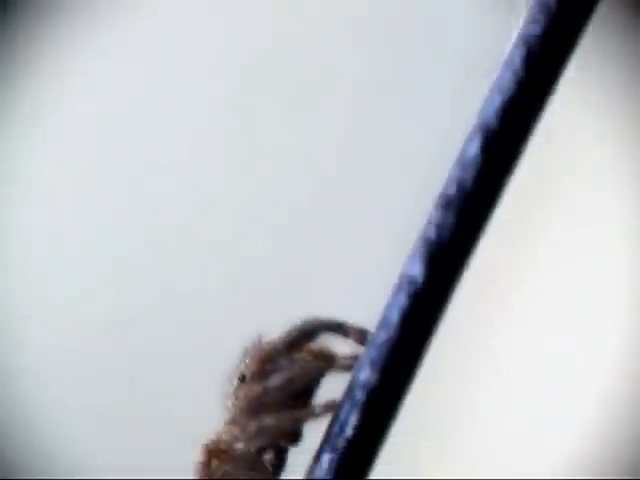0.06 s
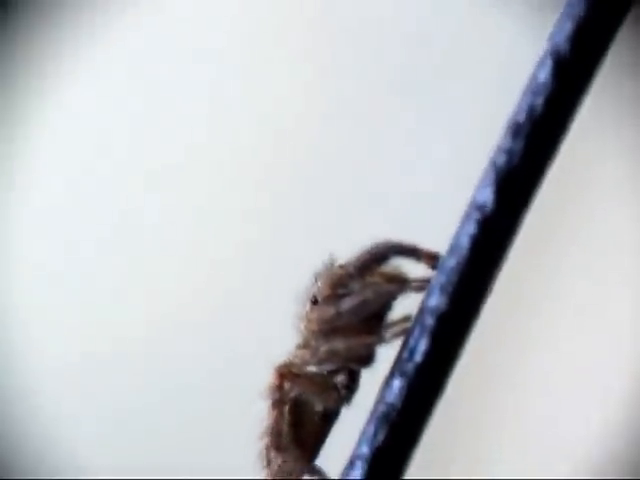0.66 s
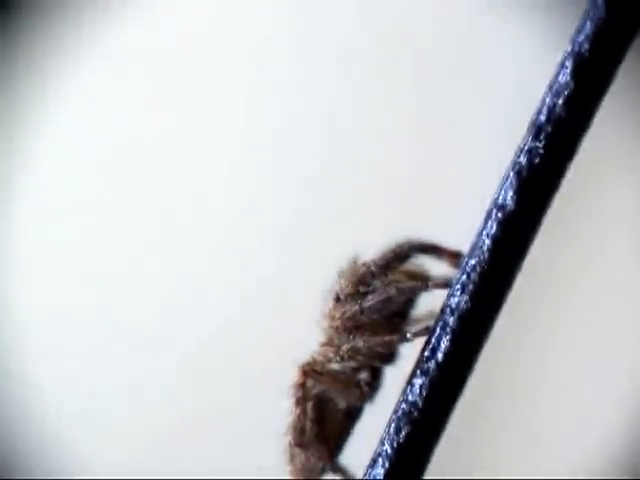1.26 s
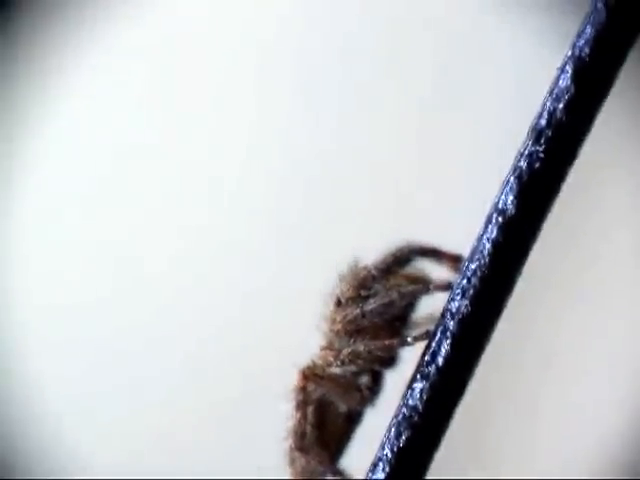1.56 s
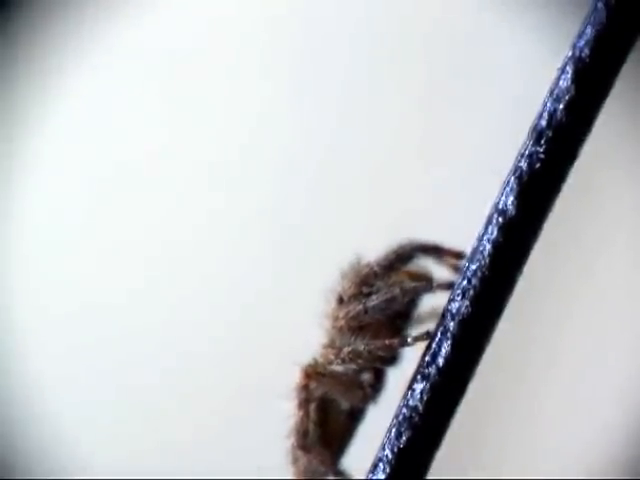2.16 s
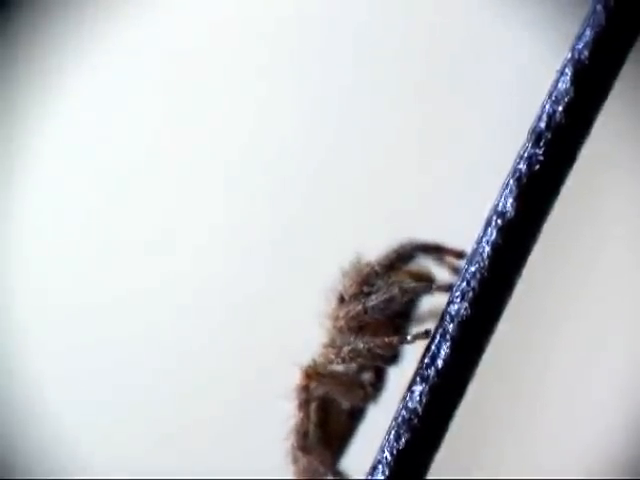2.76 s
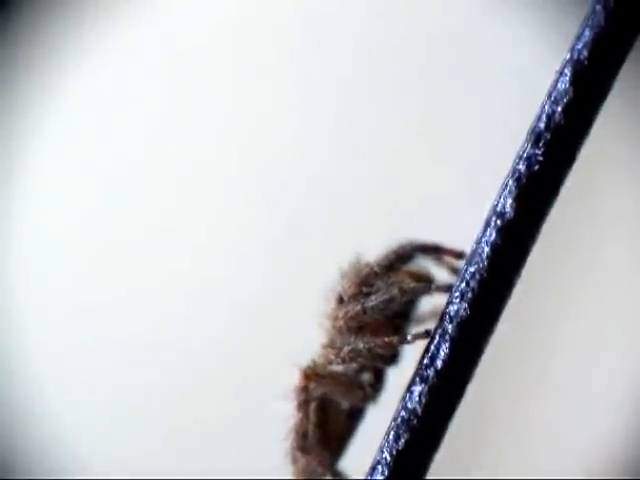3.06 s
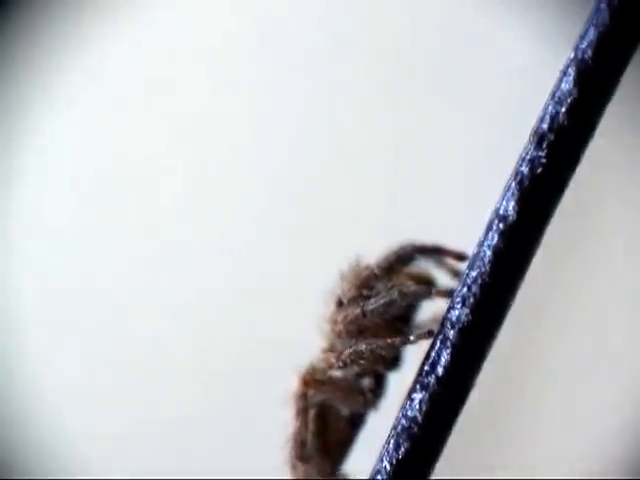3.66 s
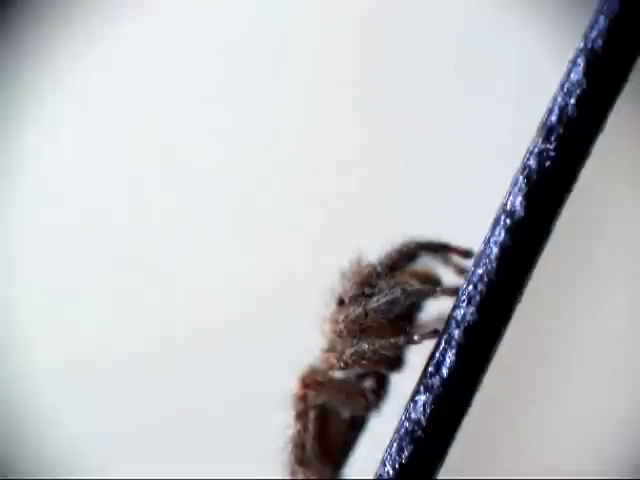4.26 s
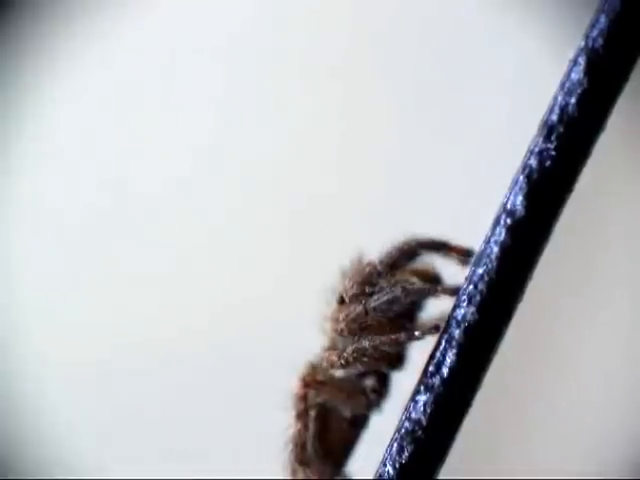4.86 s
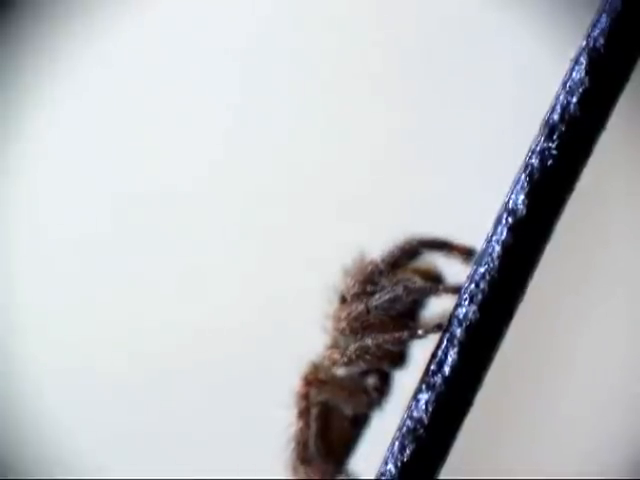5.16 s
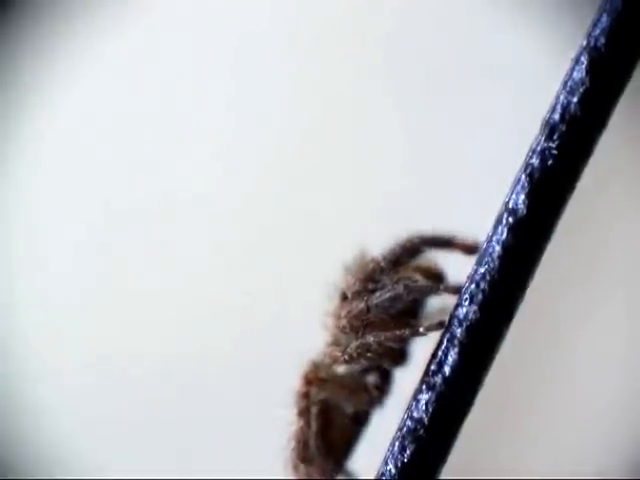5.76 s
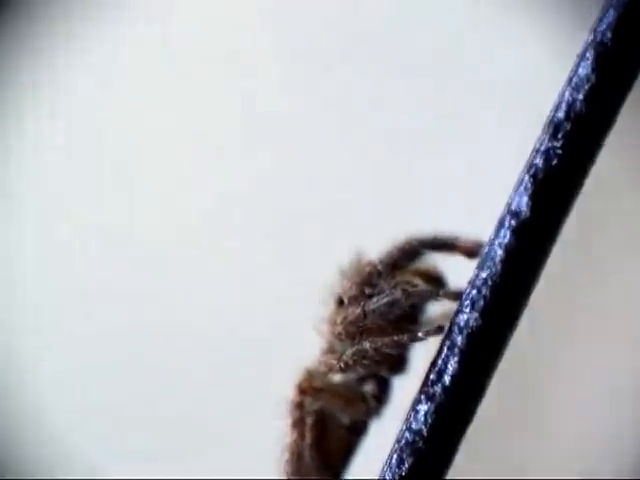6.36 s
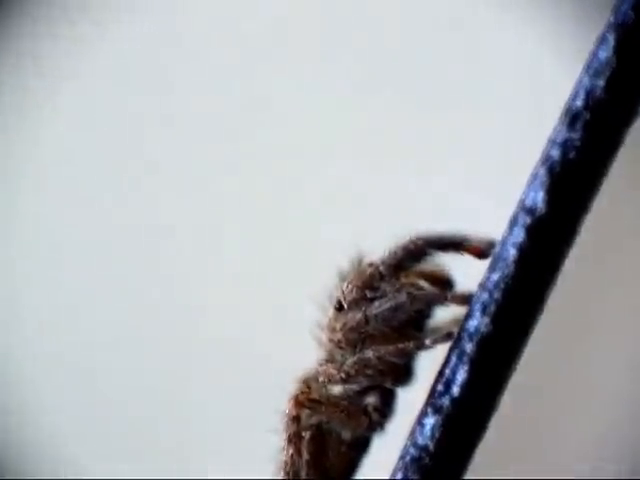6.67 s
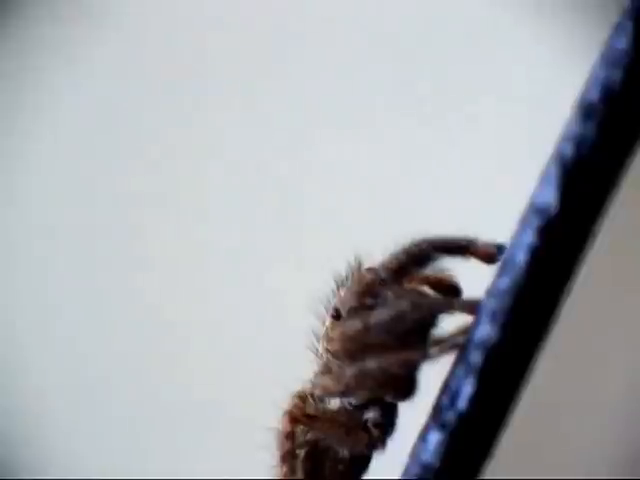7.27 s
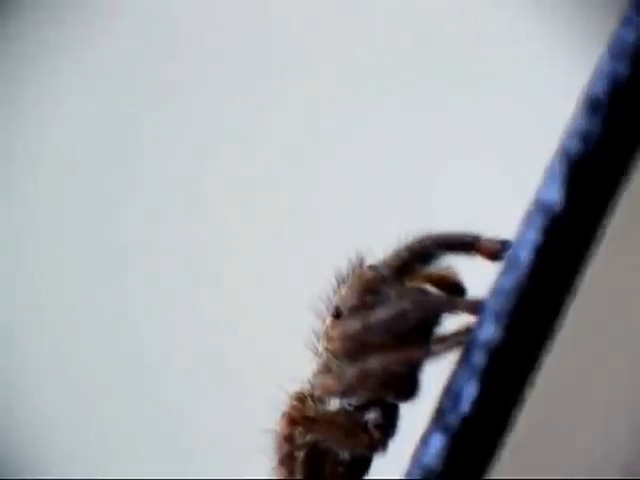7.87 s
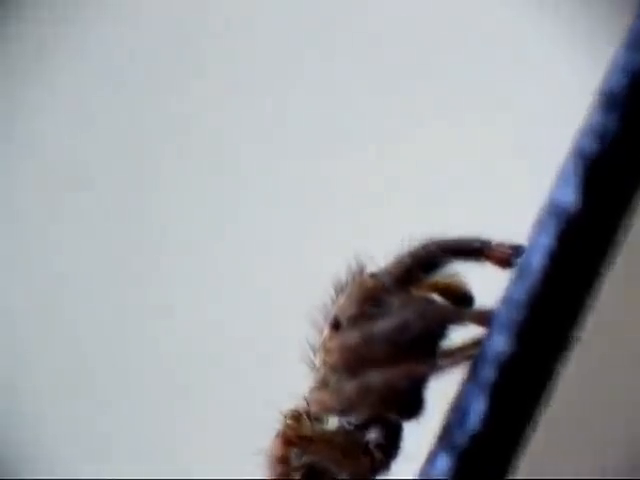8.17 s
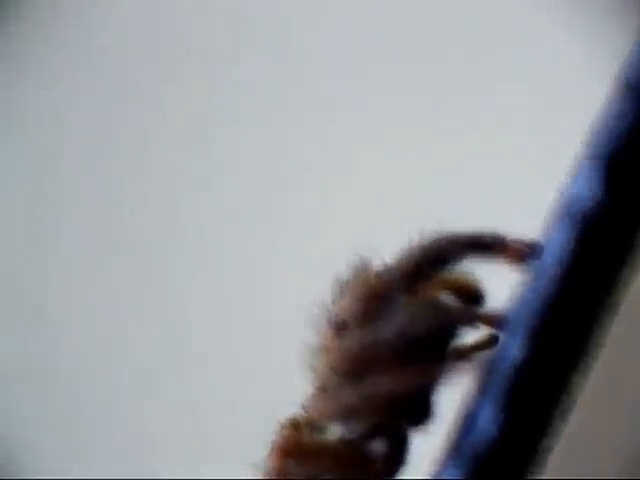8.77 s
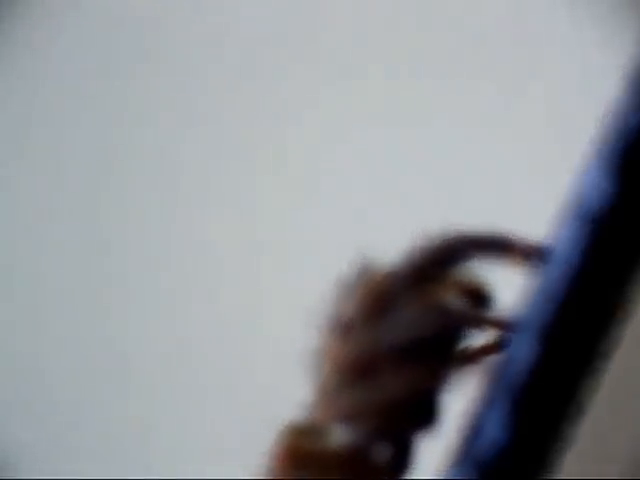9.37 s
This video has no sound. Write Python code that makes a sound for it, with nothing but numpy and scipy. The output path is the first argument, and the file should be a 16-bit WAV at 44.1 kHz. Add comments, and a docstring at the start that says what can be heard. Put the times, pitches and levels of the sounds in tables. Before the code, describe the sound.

A steady, rough microphone hiss runs for the whole ten seconds or so in an otherwise quiet room. An unseen bird chirps four times, at about 0.8, 3.3, 5.4 and 9 seconds. Each chirp is a high, thin, buzzy whistle lasting under a fifth of a second, prolonged by about half a second of room echo, so the bird seems a little way off. The chirps are the loudest sounds; the second is slightly softer and the last reaches a little higher. From the start until about 9.5 seconds, a small camera's focus motor ticks faintly close to the microphone, partly buried in the hiss. The ticks come irregularly, singly, in short even rows or as tiny quick rattles, with longer rows at about 1.7 to 2.3 seconds, around 4 seconds and just after 9 seconds.

```python
"""Bird chirps and a focus motor

In a quiet room a bird gives four buzzy chirps, frequency-modulated whistles that reverberation prolongs.
A small camera's focus motor ticks in step with the picture frames, each step exciting the modes of the
lens parts, and a faint rumble swells twice. The recorder quantizes so coarsely that the weak room noise
keeps flipping it between two levels, which makes a steady, rough hiss."""
import sys
import numpy as np
from scipy import signal
from scipy.fft import rfft, irfft
from scipy.io import wavfile

SR = 44100
rng = np.random.default_rng(int(sys.argv[2]) if len(sys.argv) > 2 else 0)


def dump(signal):
    """Clip the signal to [-1, 1] and save it as 16-bit WAV at the path in sys.argv[1]."""
    limited = np.clip(np.atleast_2d(signal).T, -1, 1)
    pcm = np.round(limited * 32767).astype(np.int16)
    wavfile.write(sys.argv[1], SR, pcm)


N = 420273
TIME = np.arange(N) / SR

# The bird's calls. Each row: start in seconds, length in seconds, source level in dB, point of greatest
# effort and length of the closing whistle as shares of the call, first, top and last pitch in Hz,
# centre and width of the throat resonance in Hz.
BIRD_CALLS = [(.789, 0.165, -26.7, 0.39, .25, 5633, 5790, 4517, 5106, 1654),
              (3.295, .185, -28, 0.57, 0.1584, 5110, 5343, 5250, 4985, 1305),
              (5.394, .158, -24.5, 0.53, .13, 5400, 5565, 4948, 4967, 1184),
              (8.972, .172, -25.5, .45, .15, 4954, 6780, 4920, 4947, 1306)]

# Modes of three lens parts. Each row: frequency in Hz, time to decay by 60 dB in seconds, gain in dB.
BARREL_MODES = [(611, .04, 1.5), (734, .025, -8), (1015, .045, -10)]
HOLDER_MODES = [(1520, .02, -0.5), (1670.3, 0.015, -8), (2982, .014, -9), (761.4, 0.033, -12.5)]
SPRING_MODES = [(4890, 0.029, 0.5), (1011.4, .045, -2.5), (5928, .015, -9), (681, .025, -5)]
# Excitation by a step from rest, at full speed forward and at full speed back.
# Each lists the gains of barrel, holder and spring in dB.
REST_KNOCK_DB = (-30.5, -35.5, -46)
FORWARD_KNOCK_DB = (-44, -24.5, -47)
BACK_KNOCK_DB = (-42, -40, -33.5)
# The focus probes with separate steps. Each row: start in seconds, number of steps, gain in dB.
FOCUS_PROBES = [(.069, 2, -2), (1.172, 1, -1.5), (1.7, 7, 0), (2.968, 2, -1), (3.933, 4, 0),
                (5.233, 1, -2.5), (5.368, 1, 1), (5.499, 3, -2), (5.969, 2, -2), (6.733, 2, -2.5),
                (7.8, 2, -2), (8.167, 3, -1.5), (9.133, 4, -1.5)]
# The focus travels, one step a frame. Each row: start in seconds, number of steps, gain in dB,
# direction (1 forward, -1 back), starting speed as a share of full speed.
FOCUS_RUNS = [(.297, 5, -.7, 1, .15), (1.564, 3, 0, 1, 0), (2.431, 3, 1, 1, 0), (3.197, 3, -.5, 1, 0),
              (4.397, 4, 0, 1, .55), (4.9, 5, .5, -1, .5), (5.1, 3, .5, -1, .5), (5.83, 3, .5, 1, 0),
              (6.197, 3, .5, 1, 0), (6.966, 5, 0, 1, .4), (7.5, 5, -1, -1, .5), (8.031, 3, .5, 1, .15),
              (8.597, 3, -1, 1, 0)]

# Spectrum of room and microphone noise. Each row: frequency in Hz, relative spectral density in dB.
NOISE_SPECTRUM = [(20, 1), (90, 1), (140, 0), (300, 0.5), (650, 0), (1200, -2), (2200, -5), (3500, -5.5),
                  (5200, -5), (6500, -3.5), (8000, -4)]
# Soft swells of rumble. Each row: start in seconds, length in seconds, level at the crest in dB.
RUMBLE_SWELLS = [(4.48, .6, -55), (7.08, .55, -53)]


def undb(db):
    return 10 ** (np.asarray(db) / 20)


def unit_rms(x):
    return x / np.sqrt(np.mean(x ** 2))


def add(track, start_s, x):
    """Superpose x on the track at a given time."""
    i = max(int(start_s * SR), 0)
    track[i:i + len(x)] += x[:max(N - i, 0)]


def filtered(x, gain):
    """Multiply the spectrum by a gain that is a function of frequency."""
    return irfft(rfft(x) * gain(np.arange(len(x) // 2 + 1) * SR / len(x)), len(x))


def resonance(centre_hz, width_hz):
    """Gain curve of a Lorentzian peak."""
    return lambda f: 1 / (1 + (2 * (f - centre_hz) / width_hz) ** 2)


def wander(t, rate):
    """Linear interpolation between random values, rate of them per unit of t."""
    knots = rng.standard_normal(N // 100)
    return np.interp(t * rate, np.arange(len(knots)), knots)


def chirp(length_s, peak_at, closing, first_hz, top_hz, last_hz, throat_hz, width_hz,
          trill_hz=135, swing_hz=1900, opening=.13):
    """Frequency modulation breaks a whistle into a buzzy trill, which the throat resonance filters."""
    t = np.arange(int(length_s * SR)) / SR
    progress = t / length_s
    trill_cycles = np.cumsum(trill_hz * (1 + .25 * wander(t, 150))) / SR
    # every swing reaches the same top but dips to its own depth
    depth_hz = (swing_hz + .9 * max(top_hz - 5400, 0)) * (1 + .16 * wander(trill_cycles, .9696))
    trill_pitch = top_hz - depth_hz * np.sin(np.pi * trill_cycles) ** 2
    whistle_pitch = np.interp(progress, [.25, .75], [first_hz, last_hz])
    # the call opens and closes on the plain whistle
    buzz = np.clip(np.minimum(progress / opening, (1 - progress) / max(closing, .01)), 0, 1) ** 3
    waver = 1 + .005 * wander(t, 400)
    pitch = (whistle_pitch + buzz * (trill_pitch - whistle_pitch)) * waver
    effort = np.interp(progress, [0, np.clip(peak_at, .1, .8), .9, 1], [0, 1, .6, 0]) ** .85
    tone = effort * np.sin(2 * np.pi * np.cumsum(pitch) / SR)
    throat = resonance(throat_hz, width_hz)
    # sidebands above the top pitch are cut away
    return unit_rms(filtered(tone, lambda f: throat(f) * (1 - np.tanh((f - top_hz) / 90))))


def bird(room_t60_s=.69, direct_db=-7):
    """The chirps arrive mostly as reverberation, a convolution with exponentially decaying echoes."""
    calls = np.zeros(N)
    for start_s, length_s, db, *voicing in BIRD_CALLS:
        add(calls, start_s, undb(db) * chirp(length_s, *voicing))
    echoes = rng.standard_normal(SR) * np.exp(-np.log(1000) * TIME[:SR] / room_t60_s)
    reverberation = signal.fftconvolve(calls, echoes / np.linalg.norm(echoes))[:N]
    return undb(direct_db) * calls + reverberation


def lens_steps(frame_hz=30, probe_frames=3, pickup_steps=1.1):
    """Excitation depends on speed: from rest a step jolts the barrel, at speed the holder or spring."""
    rest_db = np.array(REST_KNOCK_DB)
    steps = [(start_s + k * probe_frames / frame_hz, rest_db + db)
             for start_s, count, db in FOCUS_PROBES for k in range(count)]
    for start_s, count, db, direction, first_speed in FOCUS_RUNS:
        moving_db = np.array(FORWARD_KNOCK_DB if direction > 0 else BACK_KNOCK_DB)
        for k in range(count):
            speed = 1 - (1 - first_speed) * np.exp(-k / pickup_steps)
            steps.append((start_s + k / frame_hz, rest_db + speed * (moving_db - rest_db) + db))
    return steps


def lens_ring(modes, push_s, detune=.025):
    """After a short push a part vibrates freely in damped modes, tuned a little differently each time."""
    t = TIME[:SR // 10]
    tone = np.zeros(len(t))
    for hz, t60_s, db in modes:
        mistuning, phase = rng.standard_normal(2)
        decay = np.exp(-np.log(1000) * t / t60_s)
        tone += undb(db) * decay * np.sin(2 * np.pi * (hz * (1 + detune * mistuning) * t + phase))
    return tone * (1 - np.exp(-t / push_s))


def lens_rub(length_s=.012):
    """Sliding friction gives a brief burst of broadband noise."""
    count = int(length_s * SR)
    friction = filtered(rng.standard_normal(SR // 10), resonance(centre_hz=1100, width_hz=2200))
    return np.hanning(count) * unit_rms(friction)[:count]


def focus_motor(rub_db=-13.5):
    """Each step of the lens begins with friction, then an impact rings the barrel, holder and spring."""
    ticks = np.zeros(N)
    for start_s, (barrel_db, holder_db, spring_db) in lens_steps():
        knock = (undb(barrel_db) * lens_ring(BARREL_MODES, push_s=.0024)
                 + undb(holder_db) * lens_ring(HOLDER_MODES, push_s=.0016)
                 + undb(spring_db) * lens_ring(SPRING_MODES, push_s=.00065, detune=.0074))
        add(ticks, start_s - .002, knock)
        add(ticks, start_s - .005, undb(max(barrel_db, holder_db, spring_db) + rub_db) * lens_rub())
    return ticks


def room_noise(level_db=-42, drift_db=.15):
    """Room and microphone set a noise floor: broadband, Gaussian and nearly stationary."""
    hz, db = np.transpose(NOISE_SPECTRUM)
    white = rng.standard_normal(N)
    noise = filtered(white, lambda f: undb(np.interp(np.log(f + 1), np.log(hz), db)) * (f < 8000))
    return unit_rms(noise) * undb(level_db - drift_db * wander(TIME, 2))


def rumble():
    """Slow amplitude modulation makes a low band of noise rise and sink twice."""
    envelope = np.zeros(N)
    for start_s, length_s, db in RUMBLE_SWELLS:
        from_crest = 2 * (TIME - start_s) / length_s - 1
        envelope += undb(db) * np.sqrt(np.maximum(1 - from_crest ** 2, 0))
    band = filtered(rng.standard_normal(N), resonance(centre_hz=300, width_hz=260))
    return envelope * unit_rms(band)


def scene():
    """The sources superpose at one microphone, which feeds both channels."""
    return np.tile(bird() + focus_motor() + room_noise() + rumble(), (2, 1))


def record(dry, quantum=.025, threshold=-.0008, smoothing_hz=7820, top_hz=11600):
    """Coarse quantization adds hiss; a short smoothing filter passes a spectral image of the chirps."""
    sampled = signal.resample_poly(dry, 160, 441, axis=1)  # 16 kHz
    # faint noise flips between two levels and comes out louder; under a chirp this hiss sinks
    quantized = quantum * np.floor((sampled - threshold) / quantum)
    smoothing = signal.firwin(8 * 441 + 1, smoothing_hz, window=("kaiser", 5.4), fs=160 * SR)
    smoothed = signal.resample_poly(quantized, 441, 160, axis=1, window=smoothing)[:, :N]
    soft_ends = np.minimum(np.minimum(TIME, TIME[-1] - TIME) / .003, 1)
    lowpass = signal.ellip(8, .1, 70, top_hz, fs=SR, output="sos")
    return signal.sosfilt(lowpass, smoothed * soft_ends)


dry = scene()
out = record(dry)
dump(out)
```